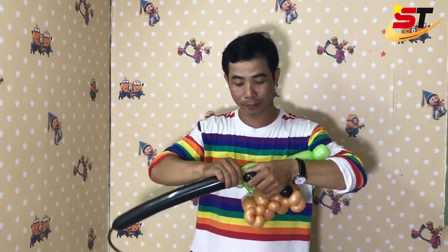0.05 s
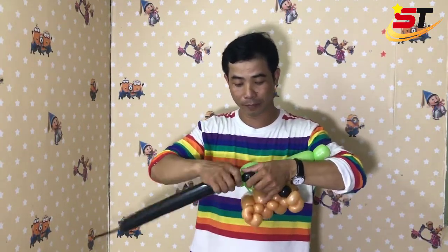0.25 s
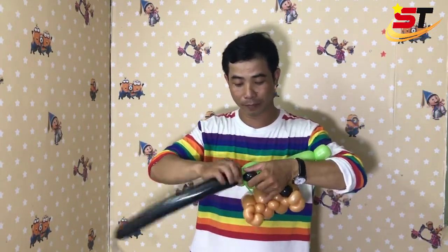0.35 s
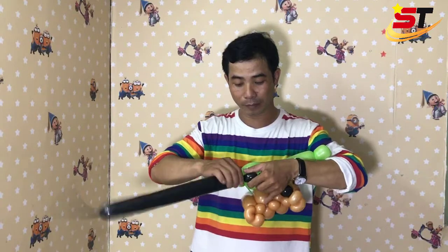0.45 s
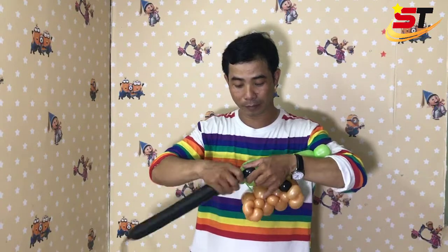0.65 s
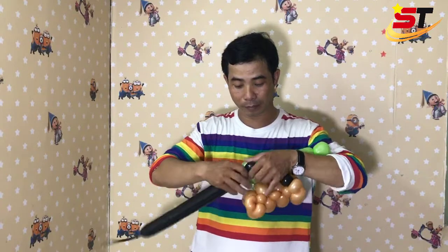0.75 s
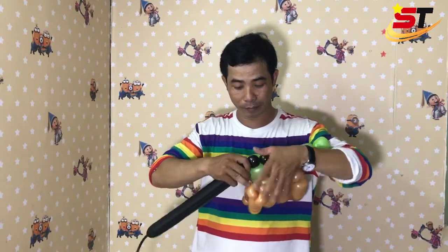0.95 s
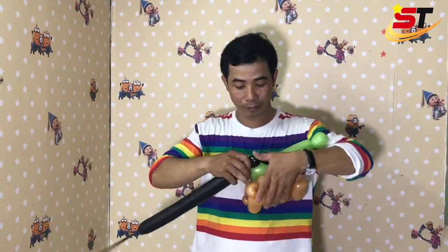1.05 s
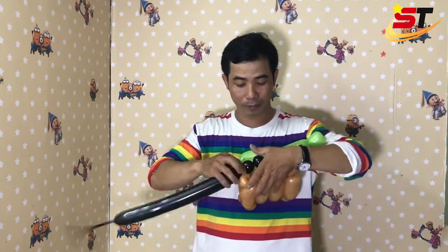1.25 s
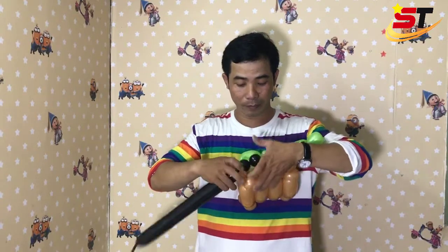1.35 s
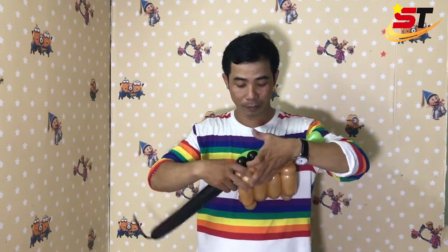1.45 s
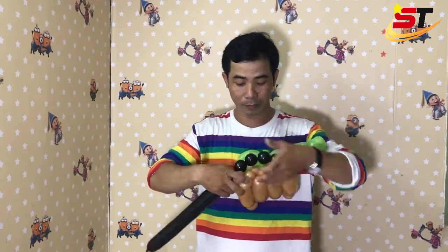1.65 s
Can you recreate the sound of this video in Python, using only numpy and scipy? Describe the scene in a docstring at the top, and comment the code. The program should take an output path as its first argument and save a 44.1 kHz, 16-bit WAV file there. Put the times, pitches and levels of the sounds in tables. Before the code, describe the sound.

Brief rubbery squeaks come from a balloon being twisted by hand, strongest early on, then giving way to lighter chirps, finger rubbing and small crackles. It sounds fairly close, in a quiet little room with bare walls.

```python
"""Short, rubbery squeaks and rasps: hands twisting a modelling balloon in a small, bare, quiet room.
Latex sticks and slips on latex: a regular slip squeaks, an uneven one rasps, the taut skin colours both.
Between them fingers rub, the twisted neck crackles and the air-filled bubbles bump softly.
The walls ring after each sound, over a faint low rumble."""
import sys
import numpy as np
from scipy import signal
from scipy.fft import rfft, irfft
from scipy.io import wavfile
from scipy.ndimage import uniform_filter1d

SR = 44100
rng = np.random.default_rng(int(sys.argv[2]) if len(sys.argv) > 2 else 0)


def output_pcm(signal):
    """Save a mono or channel-first signal as 16-bit PCM at the path in sys.argv[1].

    Samples are clipped to [-1, 1] before scaling.
    """
    pcm = np.clip(np.atleast_2d(signal).T, -1, 1) * 32767
    wavfile.write(sys.argv[1], SR, np.round(pcm).astype(np.int16))


N = 74970

# Resonances of the taut skin: f/Hz, level/dB
SKIN_EQ = [(150, -53), (400, -8.5), (550, 5), (680, -5), (850, 4.5), (1150, -1), (1510, 0.5), (1900, -2),
           (2300, 1), (2620, -1.5), (2900, -6), (3150, -3.5), (3600, -9), (4100, -10), (5000, -15.5),
           (8000, -26.5), (16000, -38)]
# Tone of the slip hiss: f/Hz, level/dB
HISS_EQ = [(500, -18.5), (1500, 11), (3000, -6.5), (6000, 2.5), (10000, -4.5), (16000, -5.5)]


def squeak(length, first_hz, last_hz, jitter, tilt_db, hiss_db, size=4096, count=200):
    """A gliding train of slips strikes the skin; each slip also hisses briefly."""
    samples = np.arange(size)
    progress = np.clip(samples / SR / length, 0, 1)
    swell = np.abs(np.sin(np.pi * progress ** 1.17)) ** 0.52  # rounded, peaking just past halfway
    cycles = np.cumsum(first_hz * (last_hz / first_hz) ** progress) / SR
    # Jitter scatters the timing and force of the slips, turning squeak into rasp.
    stretch, strength = rng.standard_normal((2, count))
    slip_cycles = np.cumsum(np.exp(jitter * stretch))
    slip_at = np.interp(slip_cycles, cycles, samples)
    force = np.interp(slip_at, samples, swell) * undb(27 * jitter * strength)
    taps = slip_at.astype(int)[:, None] + np.arange(-7, 9)
    clicks = force[:, None] * np.sinc(taps - slip_at[:, None])  # placed between samples
    pulses = np.bincount(np.clip(taps, 0, size - 1).ravel(), clicks.ravel(), size)
    tone = colour(pulses, SKIN_EQ, tilt_db, low_hz=0.96 * min(first_hz, last_hz))
    slip_phase = np.interp(cycles, np.append(0, slip_cycles), np.arange(count + 1)) % 1
    hiss = colour(swell * np.exp(-slip_phase) * rng.standard_normal(size), HISS_EQ)
    return (unit(tone) + undb(hiss_db) * unit(hiss)) * np.sqrt(length * SR / size)


# Squeak cues: t/s, length/s, first slip rate/Hz, last slip rate/Hz, level/dB, jitter/0-1,
# tilt/dB per octave, hiss against tone/dB
SQUEAK_CUES = [ (0.049, 0.049, 914, 1014, -50, 0.22, -8, -8),
               (0.066, 0.008, 1930, 1990, -48, 0.12, 2.5, -24),
               (0.12, 0.012, 1275, 1270, -52, 0.1, -3, -16), (0.205, 0.036, 2257, 2435, -43, 0.14, 2.5, -7),
               (0.22, 0.037, 1480, 1856, -36.5, 0.15, -0.5, -6.5),
               (0.254, 0.072, 1334, 1279, -38.5, 0.24, -4, -9),
               (0.289, 0.024, 723.6, 838, -24, 0.05, 0, -11),
               (.412, 0.054, 1180, 1264, -53, 0.15, -9.5, -18),
               (0.538, .043, 2203, 1345, -34.5, .14, 4, -12),
               (0.593, 0.0427, 1239, 1125, -42.5, 0.26, 5, -11.5),
               (.604, 0.038, 840, 800, -42.5, 0.04, -10, -19),
               (.628, 0.017, 813.4, 925, -27.5, 0.02, 0.5, -10.5),
               (.642, 0.034, 897.6, 853.4, -36.5, .03, -3.5, -24.5),
               (0.775, 0.049, 1371, 1313, -45, 0.17, 3.5, -16.5),
               (0.814, 0.035, 505.6, 554.3, -32, 0.12, 0, -6),
               (0.846, 0.021, 730, 762, -32, .06, -2, -11.5),
               (.902, 0.0076, 3030, 3250, -38, 0.09, -9.5, -5),
               (.906, 0.013, 1441, 1410, -41.5, 0.17, 3, -6),
               (1.150, 0.041, 1351, 1252, -54.5, .14, -1, -22),
               (1.190, 0.054, 874.6, 949, -44.5, 0.13, -3, -4.5),
               (1.219, 0.0057, 5150, 5500, -43.5, 0.02, -3, -6),
               (1.249, 0.0089, 589, 555, -38.5, 0.07, -1, -2),
               (1.3, 0.027, 1615, 1665, -43, 0.11, 5.5, -0.5), (1.358, 0.012, 500, 613, -33, 0.03, -1, -6),
               (1.372, 0.027, 690.4, 745, -39, 0.05, -3, -16),
               (1.472, 0.0085, 612, 530, -36.5, .15, 3, -20)]


def squeaks():
    """Every turn drags latex over latex at another spot in the room, so each has its own reverb tail."""
    out = np.zeros(N)
    for start, length, first_hz, last_hz, db, jitter, tilt_db, hiss_db in SQUEAK_CUES:
        add(out, start, undb(db) * room(squeak(length, first_hz, last_hz, jitter, tilt_db, hiss_db)))
    return out


# Fader moves of the finger rub: t/s, rustle level/dB, body level/dB
RUB_FADERS = [(0, -46.5, -71), (0.043, -54.5, -59), (0.074, -46, -47), (.135, -51.5, -55), (.165, -62, -80),
              (.38, -56, -54), (0.416, -46.5, -64), (.46, -62, -69), (.51, -48, -60), (0.701, -47, -67),
              (.755, -50, -56.5), (0.869, -41, -48), (0.929, -47, -50.5), (.97, -52.5, -59),
              (1.02, -49, -54), (1.131, -64, -60), (1.16, -51, -52), (1.227, -46.5, -44.5),
              (1.29, -52, -51.5), (1.35, -41, -46.5), (1.41, -41, -50), (1.49, -48.5, -44.5),
              (1.53, -52.5, -60), (1.589, -49, -48), (1.625, -55.5, -67), (1.655, -49, -51),
              (1.7, -49, -50.5)]
# Dry rustle of the skin: f/Hz, level/dB
RUSTLE_EQ = [(200, -29.5), (500, -6.5), (1000, 1.5), (2200, 1.5), (4000, -7.5), (7000, -12.5),
             (10000, -14.5), (16000, -13.5)]
# Hollow body of the bubbles: f/Hz, level/dB
BODY_EQ = [(100, -26.5), (280, -7), (400, -7), (550, 2.5), (900, -7.5), (1500, -2.5), (4000, -38)]


def rubbing(grains_per_s=2000, scatter_db=3, grip_hz=70.13, grip_db=3.5):
    """Tiny slips under the fingers, bunched by an uneven grip, rustle the skin and stir the bubbles."""
    t = np.arange(N) / SR
    times, rustle_db, body_db = np.array(RUB_FADERS).T
    hits = rng.random(N) < grains_per_s / SR
    grains = hits * rng.choice([-1, 1], N) * undb(scatter_db * np.clip(rng.standard_normal(N), -2, 2))
    grains *= undb(grip_db * wander(grip_hz))
    rustle = unit(colour(grains, RUSTLE_EQ)) * undb(np.interp(t, times, rustle_db))
    body = unit(colour(grains, BODY_EQ)) * undb(np.interp(t, times, body_db))
    return rustle + body


# Crackle cues: t/s, level/dB
CRACKLE_CUES = [(0.07, -47.5), (.126, -61), (0.2306, -29), (0.2325, -31.5), (0.2467, -40), (0.495, -40.5),
                (0.815, -50), (0.92, -39), (0.924, -48), (1.083, -44.5), (1.222, -33.5), (1.298, -35),
                (1.309, -36), (1.3605, -30.5), (1.405, -41), (1.408, -34), (1.458, -57), (1.474, -40),
                (1.686, -40.5)]
# Bright snap of peeling latex: f/Hz, level/dB
CRACKLE_EQ = [(400, -19), (1500, -7.5), (4000, 3), (7000, -4), (10000, -4), (16000, -0.5)]


def crackles(decay_s=0.0032, size=1024):
    """Stuck latex at the twisted neck peels free in bright, very short bursts."""
    out = np.zeros(N)
    fade = np.exp(-np.arange(size) / SR / decay_s)
    for start, db in CRACKLE_CUES:
        burst = unit(colour(fade * rng.standard_normal(size), CRACKLE_EQ))
        add(out, start, undb(db) * burst * np.sqrt(decay_s * SR / size))
    return out


# Bump cues: t/s, f/Hz, level/dB
BUMP_CUES = [(.995, 144.4, -53), (1.244, 174, -60.5), (1.405, 123.4, -55.5)]
# Modes of an air-filled bubble: f/multiple of the pitch, level/dB
BUBBLE_PARTIALS = [(1, 5), (2.12, 6.5), (3.3, 6)]


def bumps(attack_s=0.0064, decay_s=0.037, size=8192):
    """A nudged bubble rings low and briefly."""
    out, t = np.zeros(N), np.arange(size) / SR
    envelope = np.minimum(t / attack_s, 1) * np.exp(-np.maximum(t - attack_s, 0) / decay_s)
    for start, hz, db in BUMP_CUES:
        ring = sum(undb(mode_db) * np.sin(2 * np.pi * hz * k * t) for k, mode_db in BUBBLE_PARTIALS)
        add(out, start, undb(db) * envelope * ring)
    return out


# Reverb bands of the bare room: f/Hz, T60/s, tail against direct sound/dB
REVERB_BANDS = [(150, 0.27, -2), (800, 0.25, -5.5), (2550, 0.24, -0.5), (7400, 0.31, -2.5),
                (13900, 0.22, -2)]


def room(x, predelay_s=0.0011, build_s=0.0085, size=16384):
    """Close bare walls add a short, dense tail to the direct sound."""
    t, hz = np.arange(size) / SR, np.fft.rfftfreq(size, 1 / SR)
    centres_hz = np.array(REVERB_BANDS)[:, 0]
    noise = rfft(rng.standard_normal(size))
    onset = np.clip((t - predelay_s) / build_s, 0, 1)
    direct, tail = (t == 0), 0
    for (_, t60, db), share in zip(REVERB_BANDS, np.eye(len(REVERB_BANDS))):
        fade = onset * np.exp(-np.log(1000) * t / t60)
        band = irfft(noise * on_log_axis(hz, centres_hz, share), size)
        tail = tail + undb(db) * band * fade / np.linalg.norm(fade)
    return signal.fftconvolve(x, direct + tail)


# Room tone: f/Hz, level/dB
ROOM_TONE_EQ = [(20, -7), (55, -0.5), (76, -2), (90, 4), (115, -6.5), (200, -11), (400, -19.5),
                (1000, -13.5), (4000, -23), (16000, -41)]


def room_tone(level_db=-56):
    """A faint, steady bed of rumble that booms around 90 Hz."""
    eq_db = on_log_axis(np.fft.rfftfreq(N, 1 / SR), *np.array(ROOM_TONE_EQ).T)
    rumble = irfft(rfft(rng.standard_normal(N)) * undb(eq_db), N)
    return undb(level_db) * unit(rumble)


def colour(x, eq, tilt_db=0, low_hz=1, size=1024):
    """Causal EQ, tilted by tilt_db per octave about 1 kHz, with a steep low cut under low_hz."""
    hz = np.maximum(np.fft.rfftfreq(size, 1 / SR), 1)
    db = on_log_axis(hz, *np.array(eq).T) + tilt_db * np.log2(hz / 1000)
    db -= np.minimum(10 * np.log10(1 + (low_hz / hz) ** 10), 45)
    # Minimum phase: the ring follows the hit.
    cepstrum = irfft(np.log(undb(db)))
    cepstrum[1:size // 2] *= 2
    cepstrum[size // 2 + 1:] = 0
    return signal.fftconvolve(x, irfft(np.exp(rfft(cepstrum))))[:len(x)]


def undb(db):
    """Decibels to gain."""
    return 10 ** (np.asarray(db) / 20)


def unit(x):
    """Scale to rms 1."""
    return x / np.sqrt(np.mean(x ** 2) + 1e-20)


def on_log_axis(hz, points, values):
    """Join values by straight lines over log frequency."""
    return np.interp(np.log(np.maximum(hz, 1)), np.log(points), values)


def add(out, start, x):
    """Mix a sound in at its cue."""
    i = max(int(start * SR), 0)
    out[i:i + len(x)] += x[:max(N - i, 0)]


def wander(rate_hz):
    """Smooth random modulation with a spread near 1."""
    hold = int(SR / rate_hz)
    steps = np.repeat(rng.standard_normal(N // hold + 1), hold)
    return 1.2 * uniform_filter1d(steps, hold)[:N]


def scene():
    """Mono mix: squeaks up front, handling noise between them, room tone underneath."""
    handling = room(rubbing()) + room(crackles() + bumps())
    return (squeaks() + handling[:N] + room_tone())[None]


def record(dry):
    """A steep high cut at 15.9 kHz trims the very top."""
    high_cut = signal.firwin(401, 15900, window="blackmanharris", fs=SR)
    return signal.fftconvolve(dry, high_cut[None], mode="same")


dry = scene()
out = record(dry)
output_pcm(out)
```